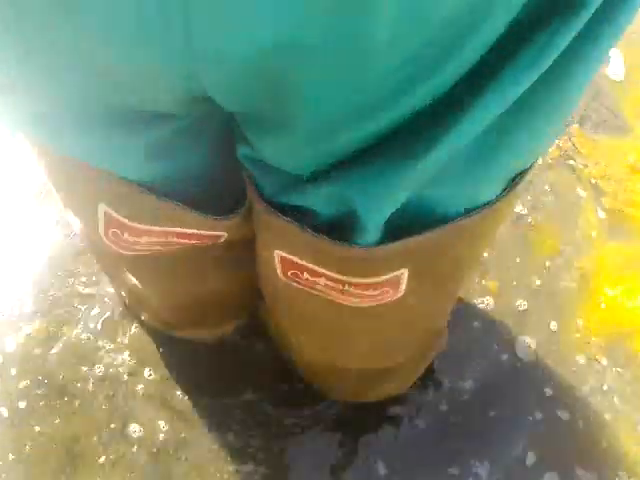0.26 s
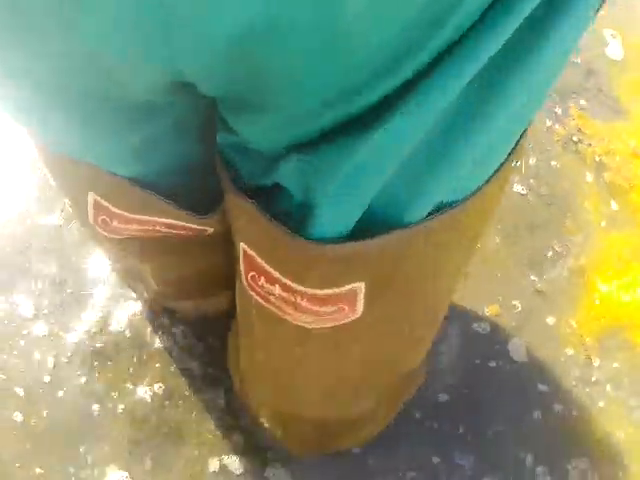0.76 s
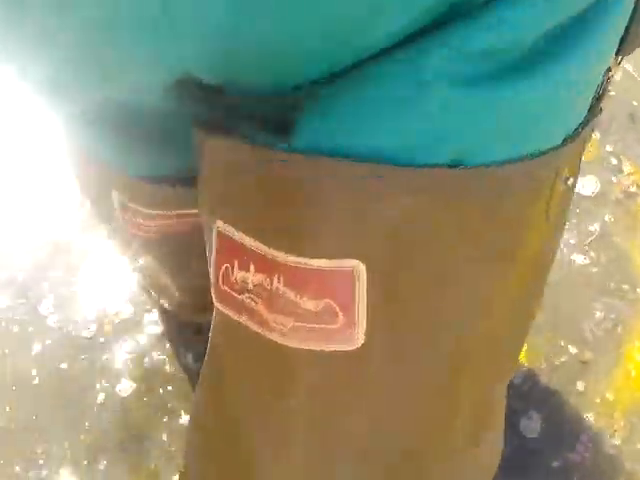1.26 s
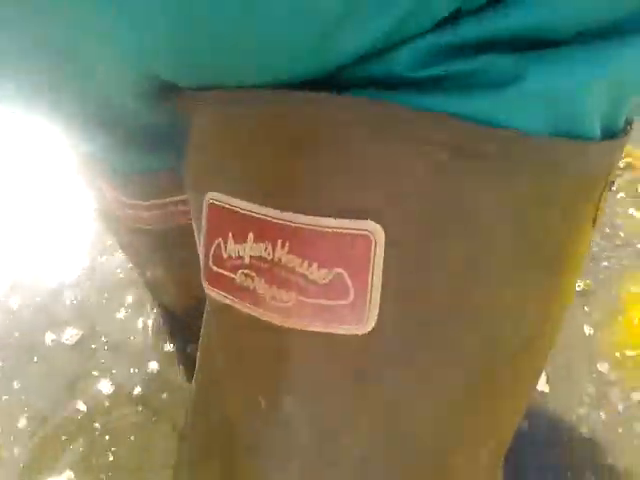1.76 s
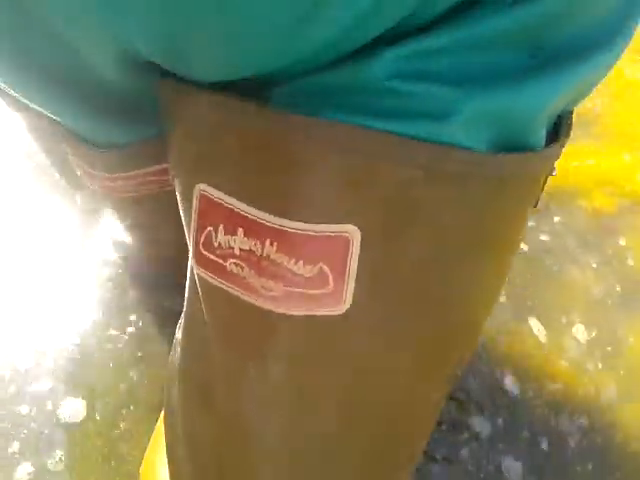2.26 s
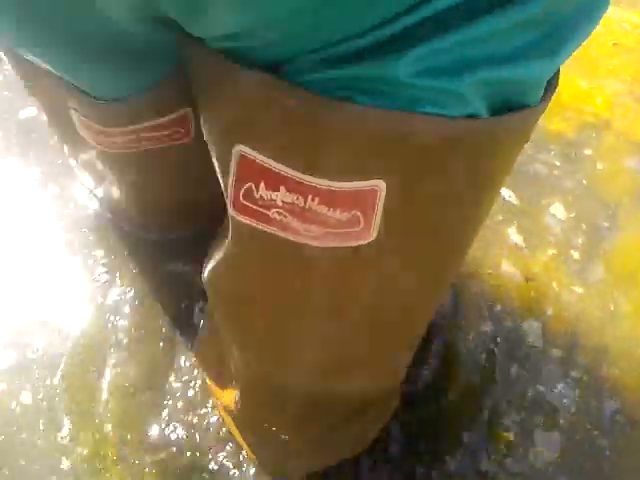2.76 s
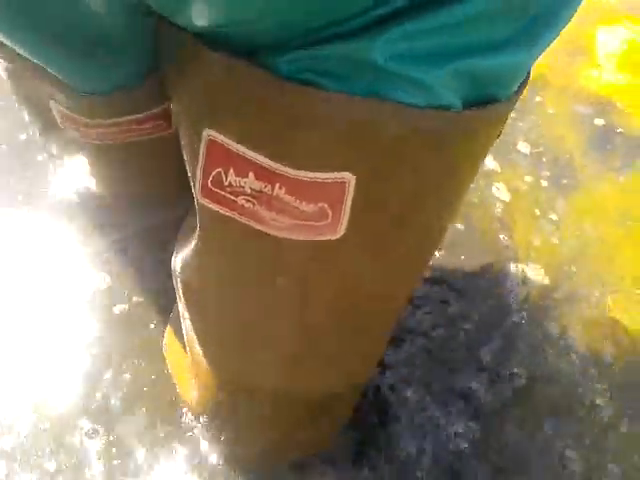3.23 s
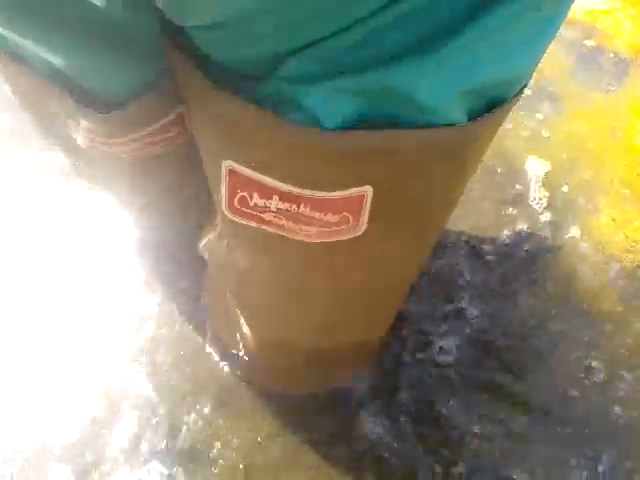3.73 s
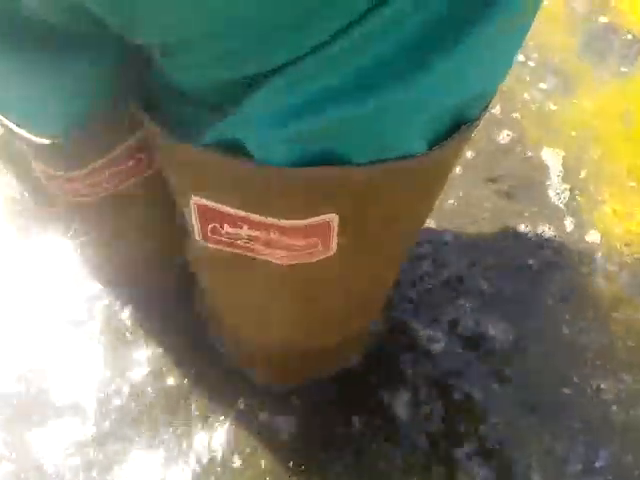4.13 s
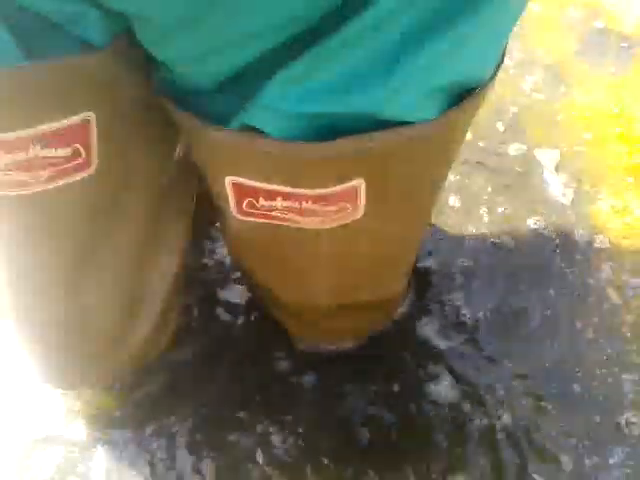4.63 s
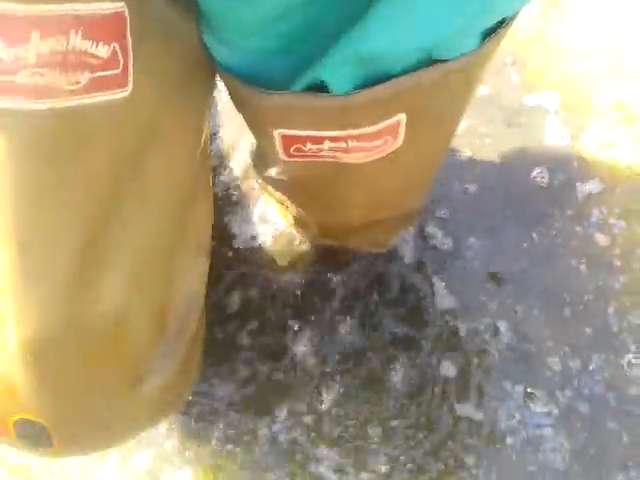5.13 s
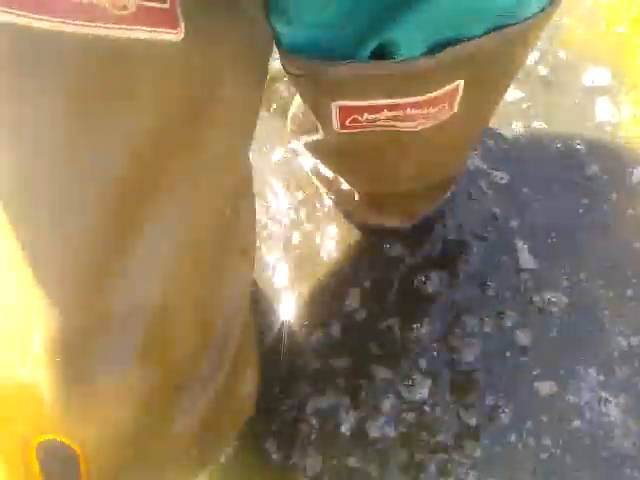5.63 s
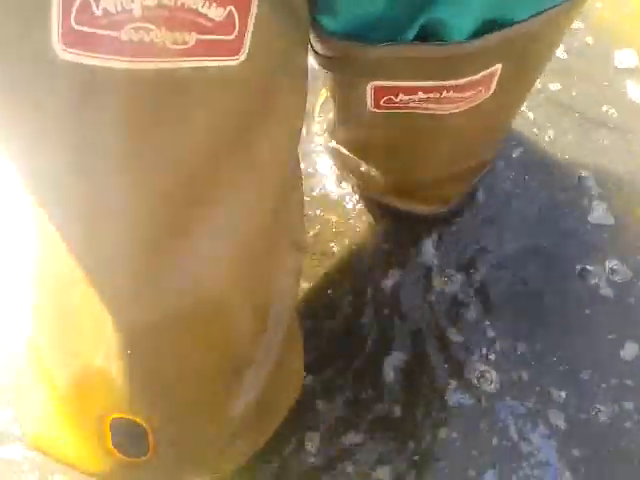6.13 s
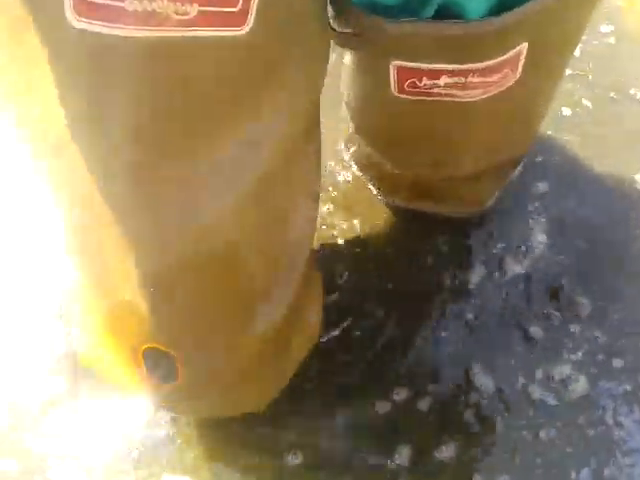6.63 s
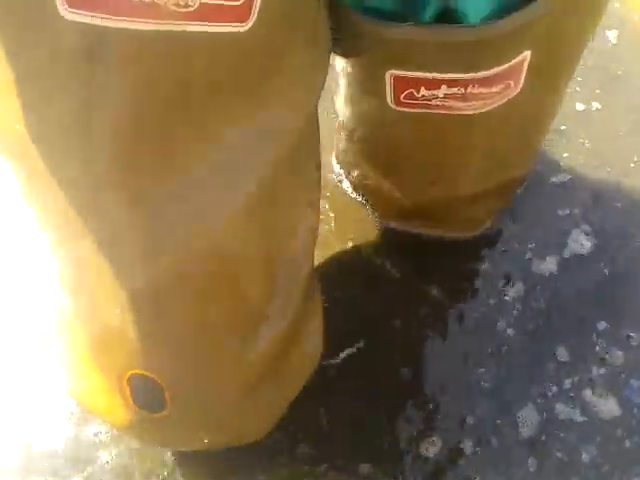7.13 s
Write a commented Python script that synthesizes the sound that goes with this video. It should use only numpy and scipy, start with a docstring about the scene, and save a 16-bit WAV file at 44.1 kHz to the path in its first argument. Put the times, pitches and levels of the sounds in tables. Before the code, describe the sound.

A continuous soft water wash swells with each slow leg movement, over steady microphone hiss. Early on, the housing is jostled, with one very loud, clipped clatter and deep thump, then lighter thuds. Bubbles blip upwards, drops tick and spatter, and small hollow gurgles ring beside the boots. The later part is calmer and quieter, close, outdoors, with dulled treble and no obvious echo.

```python
"""Rubber boots wade slowly through a shallow puddle, heard close up by a muffled microphone.
Water swishes round the legs as shaped noise that swells with each stroke, over the microphone's hiss.
Trapped air rings as short tones that mostly rise; drops tick on the surface and spatter.
Dull knocks shake the microphone's housing as short filtered pulses; one flurry overloads it."""
import sys
import numpy as np
from scipy import signal
from scipy.fft import rfft, irfft, next_fast_len
from scipy.io import wavfile
from scipy.ndimage import map_coordinates

SR = 44100
rng = np.random.default_rng(int(sys.argv[2]) if len(sys.argv) > 2 else 0)


def output_pcm(signal):
    """Save a mono or channel-first signal as 16-bit PCM at the path in sys.argv[1].

    Samples are clipped to [-1, 1] before scaling.
    """
    pcm = np.clip(np.atleast_2d(signal).T, -1, 1) * 32767
    wavfile.write(sys.argv[1], SR, np.round(pcm).astype(np.int16))


N = 325899

# A boot pushes through the water. Each row: start in seconds, length in seconds, swish level in dB,
# splash level in dB, middle pitch of its froth in Hz (levels before each layer's own trim).
STROKES = [(0.0, .5, -48, -52, 1110), (0.253, .08, -41, -47.5, 890), (0.798, .5, -46, -54, 888),
           (1.079, .25, -50.5, -47, 1180), (1.362, .24, -43, -44.5, 1504), (1.639, .14, -40.5, -44, 1460),
           (2.362, .08, -38.5, -53, 900), (2.899, .08, -42.5, -50, 1012), (3.091, .12, -48.5, -48.5, 1310),
           (4.25, .1, -45, -46, 1210), (4.44, .28, -46.5, -46.5, 1700), (4.828, .18, -47, -40.5, 976),
           (4.938, .15, -55, -44.5, 2200), (5.304, .1, -54, -49, 1100), (5.568, .12, -43, -48.5, 2080),
           (5.927, .3, -47.5, -52, 985), (6.58, .24, -43, -50, 1010), (7.271, .11, -43, -49.5, 1102)]
ATTACK_S = .04  # time the water takes to get moving


def amp(db):
    """Decibels to gain."""
    return 10 ** (np.asarray(db) / 20)


def unit(x):
    """Scale to rms 1."""
    return x / np.sqrt(np.mean(x ** 2) + 1e-20)


def wobble(rate):
    """A smooth random curve through `rate` random points a second."""
    points = rng.standard_normal(int(N * rate / SR) + 4)
    return map_coordinates(points, [np.arange(N) * rate / SR])


def filtered(x, response):
    """Shape the spectrum of x by a gain that depends on frequency in Hz."""
    size = next_fast_len(N + SR // 2)
    spectrum = rfft(x, size) * response(np.fft.rfftfreq(size, 1 / SR))
    return irfft(spectrum, size)[:N]


def lowpass(x, edge_hz, order):
    """Roll off above the edge, 6 dB an octave for each order."""
    return filtered(x, lambda hz: 1 / np.sqrt(1 + (hz / edge_hz) ** (2 * order)))


def noise(points):
    """Noise of rms 1 whose spectrum runs through (Hz, dB) points."""
    point_hz, point_db = np.transpose(points)

    def response(hz):
        """Gain read along a logarithmic frequency axis."""
        return amp(np.interp(np.log(hz + 1), np.log(point_hz), point_db))

    return unit(filtered(rng.standard_normal(N), response))


def add(track, s, sound):
    """Mix a sound into the track at time s."""
    part = track[max(round(s * SR), 0):][:len(sound)]
    part += sound[:len(part)]


def push(hz, spread, order):
    """One push through a broad resonance, peak 1: it answers with a few dying cycles."""
    ratio = 1 + spread
    edges_hz = [hz / ratio, min(hz * ratio, SR / 2 - 1)]
    band = signal.butter(order, edges_hz, "band", fs=SR, output="sos")
    wave = signal.sosfilt(band, signal.unit_impulse(SR // 20))
    return wave / np.abs(wave).max()


def bubble(length, first_hz, last_hz, swell):
    """A ringing pocket of air, peak near 1; its pitch climbs ever faster as it nears the surface."""
    u = np.linspace(0, 1, max(int(length * SR), 8))
    hz = first_hz * (last_hz / first_hz) ** u
    rising = np.sin(np.pi / 2 * np.minimum(u / swell, 1))  # swell: share of the length spent swelling
    fading = np.minimum((1 - u) / (1 - swell), 1)
    return rising * fading * np.sin(2 * np.pi * np.cumsum(hz) / SR)


def hiss():
    """The microphone's steady hiss: noise of fixed level and colour."""
    # Each row: frequency in Hz, relative level in dB.
    hiss_color = [(100, -22), (400, -10), (1200, 5), (2600, -11), (3450, -0.5), (3800, -11), (4200, -21)]
    return amp(-53.5) * noise(hiss_color)


def jolt():
    """The hardest knock shakes the whole microphone: one deep, almost one-sided thump."""
    track = np.zeros(N)
    add(track, .604, amp(-5.5) * push(80.2, spread=2.06, order=1))
    return track


def nudges(nudges_per_s=28, bump_hz=330, thud_hz=160, thud_db=-9):
    """Soft, unevenly spaced bumps and thuds while the housing is jostled."""
    # Each row: start in seconds, length in seconds, base level in dB that every nudge tops by 4 to 8 dB.
    jostles = [(.74, .07, -38.5), (1.211, .14, -33.5), (1.489, 0.11, -36.5)]
    track = np.zeros(N)
    bump = push(bump_hz, spread=0.478, order=3)
    nudge = bump + amp(thud_db) * push(thud_hz, spread=0.35, order=2)
    for s, length, db in jostles:
        count = max(round(length * nudges_per_s), 1)
        for k, (slip, size) in enumerate(rng.random((count, 2))):
            add(track, s + length * (k + slip) / count, amp(db + 4 + 4 * size) * nudge)
    return track


def knocks(click_db=-29, click_hz=2400, thud_db=-11, thud_hz=175, soft_hz=330):
    """The damped housing answers each bump with a few cycles; higher, harder ones click, low ones thud."""
    # Dull bumps and slaps on the housing. Each row: start in seconds, level in dB, pitch in Hz.
    bumps = [(0.019, -19, 271), (0.0301, -19, 252), (0.0466, -20, 322), (0.0708, -22, 320),
             (0.0827, -24, 325), (0.5328, -22, 248), (.5744, -24, 325), (0.5861, -4, 387),
             (0.5952, -3, 434), (.6025, -9.5, 537), (.604, -6.5, 1710), (0.6066, 1.5, 2575),
             (.607, 1.5, 355), (0.6091, 6, 1460), (0.6148, -8, 346), (0.639, -24.5, 300),
             (0.8528, -26, 274), (0.8801, -25, 280), (.924, -16.5, 750), (.963, -24.5, 332),
             (0.9872, -26, 614), (1.0854, -10, 658), (1.2234, -22.5, 366), (1.239, -24.5, 590),
             (1.2592, -20, 696), (1.304, -15.5, 720), (1.3265, -15, 472), (1.336, -19, 385),
             (1.4155, -12.5, 574), (3.9315, -13, 700), (4.254, -20.5, 622), (4.286, -20, 695),
             (4.2918, -18, 696), (4.392, -26, 687), (4.6914, -24, 766), (7.0463, -30, 502),
             (7.054, -24, 437), (7.165, -29.5, 460)]
    track = np.zeros(N)
    thud = push(thud_hz, spread=0.437, order=2)
    click = push(click_hz, spread=0.44, order=2)
    for s, db, hz in bumps:
        hardness = min(hz / soft_hz, 3)  # judged by the pitch
        add(track, s, amp(db) * push(hz, spread=.48, order=3))
        add(track, s, amp(db + click_db) * hardness * click)
        add(track, s, amp(db + thud_db) / hardness ** 4 * thud)
    return track


def drops(tick_db=-1, spatter_db=-8, spatter_s=.004, count=3):
    """Each drop lands with a wet tick, and its spatter rings briefly at chance pitches."""
    # Drops striking the water. Each row: start in seconds, level in dB before the trims, pitch in Hz.
    landings = [(0.8148, -28.5, 2270), (1.3687, -28, 1440), (1.4463, -33.5, 1320), (1.4647, -25.5, 1220),
                (1.488, -27, 1430), (1.551, -31.5, 1500), (1.587, -25, 2040), (1.8313, -25.5, 1744),
                (3.2176, -30.5, 1460), (3.486, -26, 2000), (3.6262, -31, 2570), (3.692, -32, 2150),
                (4.153, -34, 2500), (4.78, -32.5, 2680), (4.9326, -29, 1900), (4.957, -28, 2000),
                (5.0283, -30, 1160), (5.0793, -25.5, 1900), (5.5954, -28, 1570), (5.671, -29.5, 1810),
                (5.7272, -32.5, 2340), (5.8, -26.5, 1910), (5.843, -24.5, 1827), (5.853, -30.5, 2000),
                (5.9587, -30.5, 1440)]
    track = np.zeros(N)
    for s, db, hz in landings:
        add(track, s, amp(db + tick_db) * push(hz, spread=.6, order=3))
        for delay, pitch in rng.random((count, 2)):
            # half an octave below the tick to one above, under a ceiling
            ring_hz = min(hz * 2 ** (1.5 * pitch - .5), 3400)
            ring = bubble(7 / ring_hz, ring_hz, ring_hz * 1.1, swell=.1)
            add(track, s + spatter_s * delay, amp(db + spatter_db) * ring)
    return track


def gulps(width_hz=50):
    """Churning water keeps a hollow beside a boot ringing unsteadily: a narrow band of noise."""
    # Each row: start in seconds, length in seconds, pitch in Hz, level in dB (rms before the fades).
    hollows = [(2.356, 0.06, 400, -37), (2.941, 0.06, 438, -39.5), (3.28, 0.051, 392, -40),
               (5.945, 0.2, 623, -43), (6.167, 0.14, 520, -35), (6.605, .068, 325, -39),
               (6.778, 0.1, 450, -39.5), (7.311, 0.05, 467, -40)]
    track = np.zeros(N)
    for s, length, hz, db in hollows:
        ring = filtered(rng.standard_normal(N), lambda f: np.exp(-((f - hz) / width_hz) ** 2 / 2))
        ring = ring[:int(length * SR)]
        add(track, s, amp(db) * unit(ring) * signal.windows.tukey(len(ring), .7))
    return track


def burbles(count=7, middle_hz=1150, cycles=18, climb=.014):
    """Small bubbles surface in quick succession; each climbs a fixed share of an octave per cycle."""
    # Clusters of small bubbles, most of them during a stroke.
    # Each row: start in seconds, length in seconds, level in dB.
    clusters = [(1.459, .14, -35), (1.65, 0.094, -35.5), (1.724, .11, -42), (4.848, 0.21, -45),
                (6.779, .52, -41)]
    track = np.zeros(N)
    for s, length, db in clusters:
        for k, (slip, pitch, life) in enumerate(rng.random((count, 3))):
            hz = middle_hz * 2 ** (1.4 * (pitch - .5))
            turns = cycles * (life + .5)
            glide = bubble(turns / hz, hz, hz * 2 ** (climb * turns), swell=.43)
            add(track, s + length * (k + slip) / count, amp(db) * glide)
    return track


def bubbles(plip_cycles=14.4, plip_rise=1.084):
    """Pockets of air that stand out, sometimes two or three together: some plip, some bloop upwards."""
    # Bubbles of nearly steady pitch. Each row: start in seconds, level in dB, first pitch in Hz.
    plips = [(1.138, -30, 1710), (1.213, -31.5, 1440), (1.464, -24, 917), (1.488, -26.5, 883),
             (1.551, -21.5, 1120), (1.642, -26.5, 583), (1.676, -24.5, 1125), (1.709, -25.5, 448),
             (1.716, -26, 1400), (1.831, -27, 868), (1.846, -28.5, 1780), (2.009, -28.5, 474),
             (2.919, -35, 1170), (2.921, -30.5, 1430), (2.921, -32.5, 349), (3.165, -32, 2970),
             (3.627, -34, 735), (3.69, -32, 609), (4.698, -30.5, 1730), (4.778, -27.5, 2670),
             (4.891, -30, 910), (5.028, -22.5, 1040), (5.35, -28, 1620), (6.959, -34.5, 1370),
             (6.959, -37, 1950), (7.225, -32, 3120)]
    # Bubbles that climb as they reach the surface. Each row: start in seconds, length in seconds,
    # first pitch in Hz, climb in octaves, level in dB.
    bloops = [(1.375, 0.016, 1380, 0.47, -32.5), (1.481, 0.023, 1123, 0.95, -33),
              (1.586, 0.014, 1330, 0.51, -28.5), (1.666, 0.016, 854, .55, -29.5),
              (1.672, 0.042, 593, .6, -29.5), (1.741, .026, 1420, 0.55, -33.5),
              (2.012, .056, 438.5, 1.3, -35), (2.741, 0.078, 418, 0.63, -35.5),
              (3.114, 0.044, 1410, 0.23, -39.5), (3.164, 0.041, 798, 1.11, -27.5),
              (3.481, 0.019, 1750, 0.42, -33), (4.971, 0.032, 950, 1.12, -36.5),
              (5.35, 0.033, 845, 1.38, -24), (6.527, 0.024, 1016, 0.87, -27), (7.09, 0.02, 1166, 0.69, -40)]
    track = np.zeros(N)
    for s, db, hz in plips:
        add(track, s, amp(db) * bubble(plip_cycles / hz, hz, hz * plip_rise, swell=.16))
    for s, length, hz, octaves, db in bloops:
        add(track, s, amp(db) * bubble(length, hz, hz * 2 ** octaves, swell=.43))
    return track


def froth(bubbles_per_s=380, cycles=12, scatter=.3, rise=1.1, grain_db=-46, reference_db=-45, growth=1.5):
    """Each stroke traps a crowd of tiny bubbles that ring for a few cycles, far louder in hard splashes."""
    track = np.zeros(N)
    for s, length, _, splash_db, middle_hz in STROKES:
        db = grain_db + growth * (splash_db - reference_db)
        span = length + ATTACK_S
        count = round(bubbles_per_s * span)
        traits = rng.standard_normal((count, 3)).clip(-2, 2)
        for when, (pitch, size, life) in zip(rng.random(count), traits):
            hz = middle_hz * np.exp(scatter * pitch)
            ring = bubble(cycles * np.exp(life / 2) / hz, hz, hz * rise, swell=.2)
            surge = np.sqrt(np.sin(np.pi * when))  # loudest midway through the stroke
            add(track, s - ATTACK_S / 2 + when * span, amp(db + size) * surge * ring)
    return track


def trickle(splash_db, count=420, middle_hz=1700, scatter=.3, cycles=10, rise=1.2):
    """Tiny droplets plip all the time, crowding where the water splashes."""
    track = np.zeros(N)
    share = np.cumsum(amp(splash_db) ** 2)  # chance follows the splash power
    starts = np.searchsorted(share / share[-1], rng.random(count))
    for i, (pitch, size) in zip(starts, rng.standard_normal((count, 2)).clip(-2, 2)):
        hz = middle_hz * np.exp(scatter * pitch)
        plip = bubble(cycles / hz, hz, hz * rise, swell=.06)
        add(track, i / SR, amp(splash_db[i] - 1 + 4 * size) * plip)
    return track


def ripples(swish_db, count=240, middle_hz=750, scatter=.35, cycles=9, rise=1.25):
    """Faint bubbles all along, louder where the water moves faster."""
    track = np.zeros(N)
    starts = rng.integers(0, N, count)
    for i, (pitch, size) in zip(starts, rng.standard_normal((count, 2)).clip(-2, 2)):
        hz = middle_hz * np.exp(scatter * pitch)
        ring = bubble(cycles / hz, hz, hz * rise, swell=.26)
        add(track, i / SR, amp(swish_db[i] - 4 + 2 * size) * ring)
    return track


def flow(rest_swish_db=-42, rest_splash_db=-48, settle_s=.1):
    """Swish and splash levels in dB: each stroke swells, holds and settles on top of the lapping."""
    t = np.arange(N) / SR
    swish_power = np.full(N, amp(rest_swish_db) ** 2)
    splash_power = np.full(N, amp(rest_splash_db) ** 2)
    for s, length, swish_db, splash_db, _ in STROKES:
        gathering = np.clip((t - s) / ATTACK_S + 1, 0, 1)
        settling = np.exp(-np.maximum(t - s - length, 0) / settle_s)  # to 1/e once the boot stops
        speed = gathering * settling
        swish_power += (amp(swish_db) * speed) ** 2
        splash_power += (amp(splash_db) * speed) ** 2
    return 10 * np.log10(swish_power), 10 * np.log10(splash_power)


def swishing(swish_db, splash_db, swish_trim_db=-1.5, splash_trim_db=-4, slosh_db=1.56, churn_db=1):
    """Water shears round the boots; faster water breaks into brighter splashing."""
    # Spectra of the two noises. Each row: frequency in Hz, relative level in dB.
    swish_color = [(24, -67), (40, -45), (108, -25.5), (314, 0.5), (559, -1.5), (646, -1.5), (847, -7.5),
                   (961, -7.5), (1400, -19), (1510, -15.5), (1910, -23), (2420, -33.5), (3000, -34),
                   (3900, -62), (6600, -120)]
    splash_color = [(300, -21.5), (600, -3.5), (950, 1), (1500, -7.5), (2200, -10.5), (3300, -14.5),
                    (4200, -20)]
    slosh = slosh_db * wobble(9.8)  # slow unsteadiness shared by both
    swish_level = swish_db + swish_trim_db + slosh + churn_db * wobble(45)
    swish = amp(swish_level) * noise(swish_color)
    splash_level = splash_db + splash_trim_db + slosh + churn_db * wobble(70)
    splash = amp(splash_level) * noise(splash_color)
    return swish + splash


def scene():
    """Water and knocks over the microphone's steady hiss."""
    swish_db, splash_db = flow()
    wash = swishing(swish_db, splash_db) + ripples(swish_db) + trickle(splash_db)
    water = wash + bubbles() + burbles() + gulps() + drops() + froth()
    housing = knocks() + nudges() + jolt()
    return (water + housing + hiss())[None]


def record(dry, muffle_hz=3698, band_hz=4350, overload=.68, knee=5, air_hz=9000, top_hz=16600):
    """The microphone dulls the treble, then cuts it off; only its overload reaches higher."""
    muffled = lowpass(dry[0], muffle_hz, order=10)
    dull = lowpass(muffled, band_hz, order=40)
    # peaks bend over and flatten out at the overload level
    clipped = dull / (1 + np.abs(dull / overload) ** knee) ** (1 / knee)
    softened = lowpass(clipped, air_hz, order=1)
    return filtered(softened, lambda hz: hz < top_hz)[None]


dry = scene()
out = record(dry)
output_pcm(out)
```